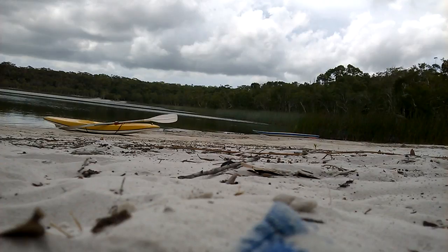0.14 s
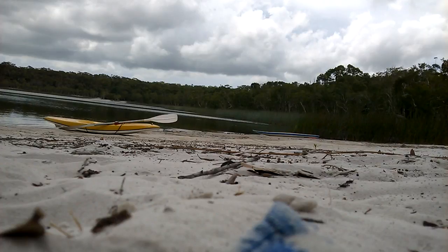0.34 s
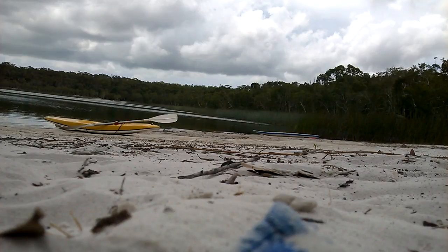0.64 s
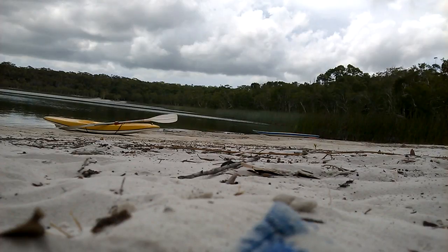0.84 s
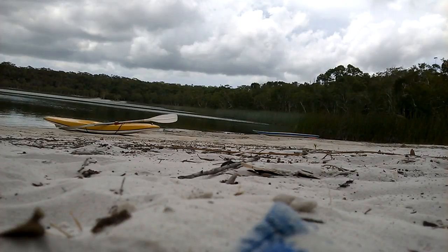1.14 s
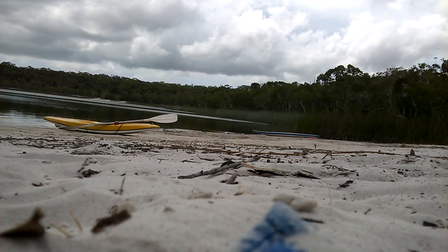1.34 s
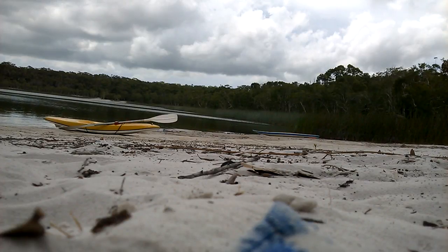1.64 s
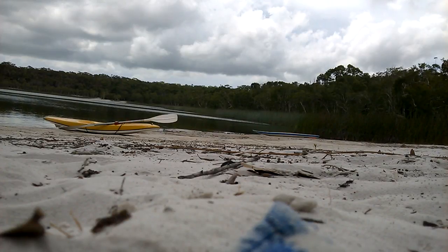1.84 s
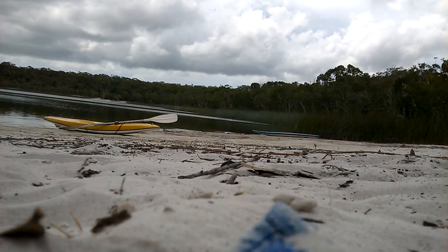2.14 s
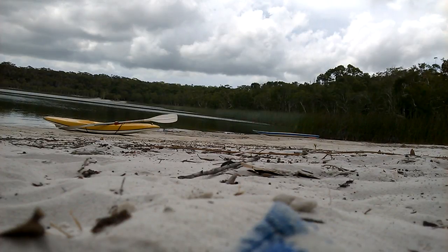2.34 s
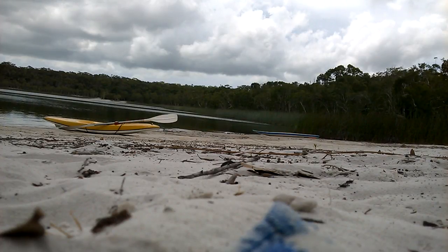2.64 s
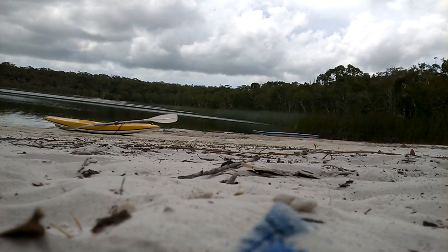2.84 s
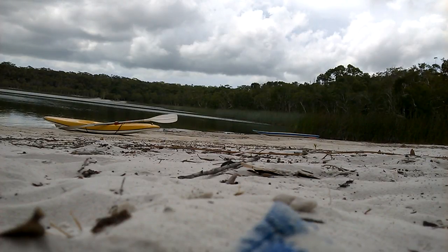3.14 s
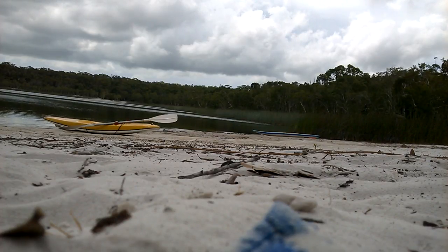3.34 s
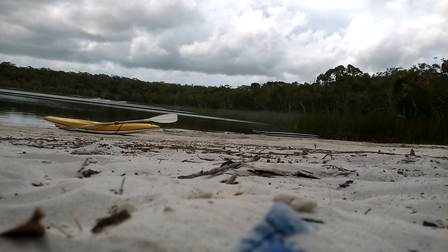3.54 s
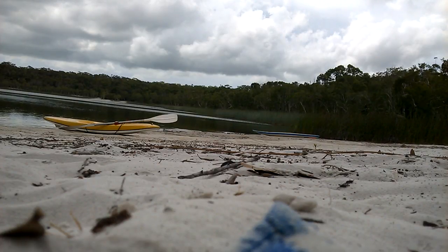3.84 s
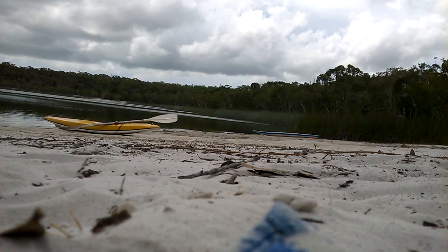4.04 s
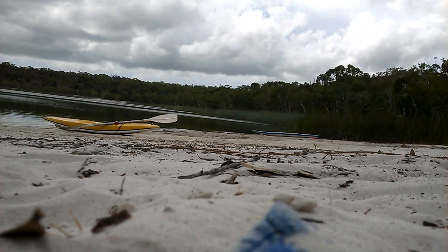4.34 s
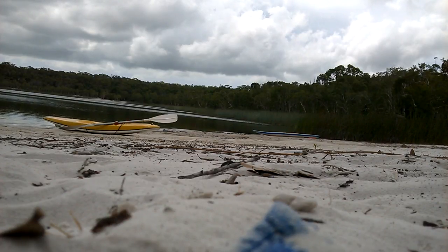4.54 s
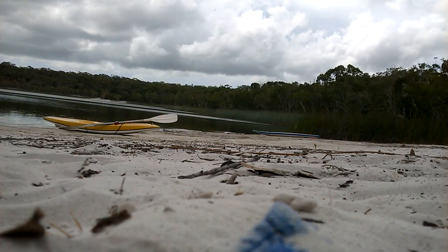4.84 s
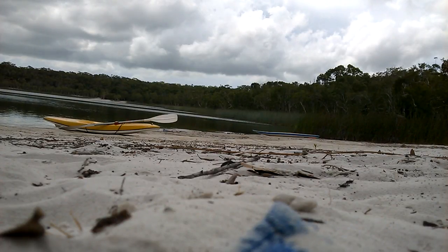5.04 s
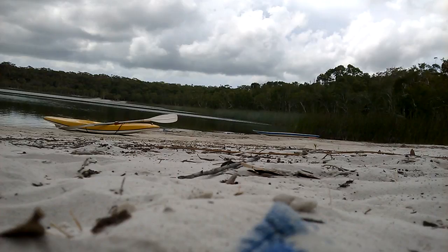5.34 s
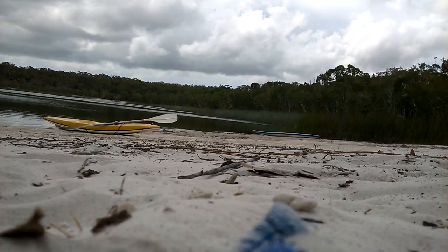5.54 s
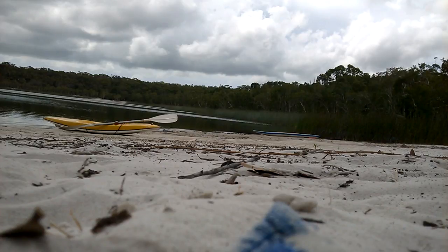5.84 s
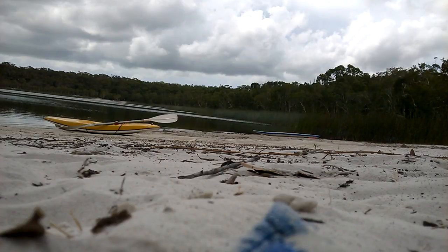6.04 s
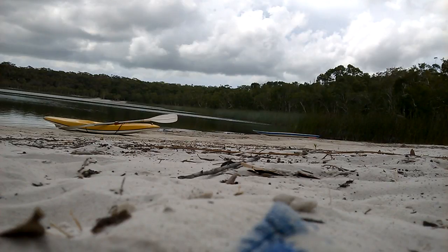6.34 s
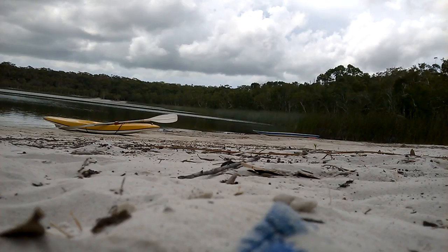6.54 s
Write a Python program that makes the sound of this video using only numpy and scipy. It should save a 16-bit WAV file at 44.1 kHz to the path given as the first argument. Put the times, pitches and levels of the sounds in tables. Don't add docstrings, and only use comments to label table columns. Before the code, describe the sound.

From 0 s a dense frog chorus is already in full cry beside a still, reedy lake. Dozens of croaks per few seconds overlap irregularly, each only about 0.02 to 0.07 s long: a tiny burst of rapid pulses, hollow and nasal around 1.2 kHz, with a lower sac resonance near 550 Hz. Some are sharp and close, others duller, deeper or half buried, and weak far-bank croaks blur behind. Water and trees return short, dull echoes. Far below in level, soft wind rumbles, cicadas throb in a faint steady shimmer around 3 to 8 kHz, and a thin near insect buzzes above 10 kHz, swelling to chirps roughly every 0.3 s. At about 2 s one very brief low gust passes. Strong croaks cluster around 4.1 to 5.1 s and near 5.9 s; the chorus continues undiminished to about 6.7 s. Mono, fixed beach microphone.

```python
import sys
import numpy as np
from scipy import signal
from scipy.fft import rfft, irfft
from scipy.io import wavfile

SR = 44100
rng = np.random.default_rng(int(sys.argv[2]) if len(sys.argv) > 2 else 0)


def log_audio(samples):
    frames = np.atleast_2d(samples).T
    limited = np.clip(frames, -1, 1)
    pcm = np.round(limited * 32767).astype(np.int16)
    wavfile.write(sys.argv[1], SR, pcm)


def amplitude_ratio(level_db):
    exponent = np.asarray(level_db, float) / 20
    return 10 ** exponent


N = 294588

# frequency_hz, density_db
WIND_SPECTRUM = [(12, -12), (20, -4), (76, 2.5), (105, 1), (313, -9.5), (420, -16), (550, -36), (920, -120)]
# frequency_hz, density_db
AIR_SPECTRUM = [(300, -4.5), (2000, -8), (3000, -16), (8800, -20), (14000, -21.5), (17000, -16),
                (19000, -31)]
# frequency_hz, density_db
MIDDLE_DRONE = [(1900, -10.5), (2600, -2.5), (3120, 0), (3910, 4.5), (5020, 3), (5500, 0.5), (5900, -18),
                (6500, -18)]
# frequency_hz, density_db
UPPER_DRONE = [(4000, -33), (5000, -13), (5900, -6), (6300, -2), (7200, -4.5), (8000, -9), (9500, -15.5)]
# pitch_hz, level_db
WHISTLES = [
    (3973, -90.5),
    (4963, -89.5),
]
# frequency_hz, density_db
BUZZ_SPECTRUM = [(8000, -36), (9300, -8.5), (10300, -2), (11100, 0.5), (12500, -3.5), (14000, -5.5),
                 (16000, -19)]
# frequency_hz, density_db
CHIRP_SPECTRUM = [(9500, -14), (11000, 1), (12500, 1), (13700, 5), (15500, -16), (17000, -5)]
# start_s, level_db
CHIRPS = [(.117, -81), (.444, -84), (.78, -83), (1.125, -82), (1.426, -80), (1.743, -84), (2.049, -83),
          (2.406, -88), (2.727, -82), (3.045, -86), (3.364, -82), (3.71, -81), (4.057, -89), (4.427, -86),
          (4.518, -87), (4.79, -80), (5.18, -84), (5.556, -83), (5.955, -84), (6.4, -88)]
# start_s, level_db, length_s, pulse_rate_hz
HIDDEN_FROGS = [(.333, -52, 0.019, 308), (.395, -44.5, 0.042, 288), (.731, -54, 0.034, 284.6),
                (1.088, -53, 0.039, 281), (.934, -43.5, 0.014, 291), (1.122, -55, 0.028, 285.6),
                (1.308, -43, 0.035, 273.3), (1.398, -39, 0.026, 308.6), (2.114, -53.5, 0.019, 288),
                (2.209, -43.5, 0.038, 278.6), (2.255, -52, 0.076, 258), (2.749, -45.5, 0.037, 310.7),
                (3.193, -42.5, 0.043, 290), (3.323, -50, 0.044, 267), (3.451, -44.5, 0.04, 293),
                (3.521, -52, 0.025, 273), (3.971, -41.5, .016, 274.7), (4.079, -44.5, 0.035, 289.3),
                (5.286, -53.5, 0.046, 276), (5.935, -51, 0.046, 269), (6.0, -65, .052, 266),
                (6.066, -49.5, 0.021, 280.6), (6.383, -44, 0.046, 269.2), (.002, -62, 0.02, 280),
                (5.247, -49, 0.021, 279), (6.047, -42, .018, 282), (6.398, -48, 0.018, 279),
                (1.258, -65, .03, 292)]
# start_s, level_db, length_s, pulse_rate_hz
LARGE_FROGS = [(.024, -59, 0.021, 281), (.064, -54, 0.03, 289), (1.54, -49.5, 0.035, 264),
               (1.923, -49.5, .053, 259.4), (2.18, -50.5, 0.037, 275.5), (2.508, -51.5, 0.033, 270.5),
               (2.524, -43, 0.024, 261.3), (2.688, -60.5, 0.034, 263), (2.875, -48, .028, 275.4),
               (3.059, -55.5, 0.039, 268.3), (3.54, -44.5, .037, 264.8), (3.57, -46.5, 0.027, 285.2),
               (3.689, -58, 0.018, 265), (3.761, -52, 0.037, 278.7), (4.195, -51, 0.026, 269.7),
               (4.32, -56.5, 0.034, 288), (4.359, -45, 0.035, 258), (4.542, -49, 0.047, 274),
               (4.82, -47.5, 0.045, 284), (4.877, -46.5, .049, 281.8), (5.058, -45, 0.011, 281),
               (5.345, -60, .029, 279.5), (5.547, -57.5, .019, 257.5), (5.693, -48, 0.048, 272.6),
               (6.348, -55.5, 0.032, 278.5), (6.612, -45.5, 0.022, 277.2)]
# start_s, level_db, length_s, pulse_rate_hz
MIDDLE_FROGS = [(.08, -45, 0.042, 285), (.123, -56, 0.046, 257), (.288, -57.5, 0.0088, 296),
                (.374, -52.5, 0.061, 264.5), (.912, -43, 0.043, 300.5), (1.458, -49, .052, 269),
                (1.72, -50.5, 0.035, 285), (1.809, -54, .018, 272), (1.902, -46.5, 0.028, 272.6),
                (1.944, -55, 0.032, 276.2), (2.406, -46.5, 0.025, 282.7), (2.755, -51, 0.015, 326),
                (2.831, -43, .019, 272.6), (2.954, -51.5, 0.033, 283), (3.136, -53.5, 0.025, 278),
                (3.798, -51, 0.022, 292), (3.834, -62, .029, 313), (4.403, -55, 0.036, 264.7),
                (4.767, -47, 0.05, 297.7), (5.228, -48.5, 0.044, 277), (5.367, -52.5, 0.038, 284.5),
                (5.785, -45.5, 0.045, 283.7), (6.031, -44, .039, 278), (6.53, -44.5, 0.028, 274.3)]
# start_s, level_db, length_s, pulse_rate_hz
FLOATING_FROGS = [(.171, -49, 0.027, 284), (.498, -45, 0.014, 268), (.512, -42.5, .059, 282.2),
                  (.785, -62, 0.024, 300.5), (1.058, -65.5, 0.073, 306), (2.727, -54, .017, 288),
                  (2.933, -62, 0.056, 304.4), (3.069, -42.5, 0.039, 265.3), (3.431, -59, 0.076, 289),
                  (3.938, -61.5, 0.031, 286), (4.062, -57, 0.052, 282.3), (4.098, -48.5, 0.072, 277),
                  (4.92, -45, 0.018, 253), (5.028, -43, 0.0308, 274.8), (5.221, -78, 0.06, 278),
                  (5.885, -43, 0.0265, 278.7), (5.407, -55.5, 0.03, 295), (5.504, -54, .031, 288.4),
                  (5.575, -50, .026, 281), (5.652, -60, .032, 289.4), (5.773, -52, 0.029, 281),
                  (5.848, -49, .012, 299), (5.908, -43, 0.035, 265.8), (6.186, -56.5, 0.025, 286),
                  (6.238, -58, .017, 308), (6.308, -56.5, 0.034, 289.7), (6.479, -60, 0.029, 302),
                  (6.499, -45, 0.024, 283), (6.674, -57, .032, 300)]
# start_s, level_db, length_s, pulse_rate_hz
SMALL_FROGS = [(.556, -40.5, 0.043, 289.6), (.65, -46.5, 0.032, 290.7), (.689, -50, .027, 303),
               (1.015, -50.5, 0.026, 283.6), (1.377, -57, 0.029, 263), (1.661, -45.5, 0.029, 287),
               (1.742, -42, 0.033, 277), (1.831, -40, 0.039, 282.4), (2.051, -43.5, 0.043, 294.5),
               (2.312, -41, 0.0446, 277), (2.469, -49, 0.022, 290), (2.619, -41.5, 0.034, 275.4),
               (2.797, -44, 0.048, 278.2), (3.266, -48, 0.027, 262), (3.268, -41.5, 0.051, 276.2),
               (3.345, -40.5, .039, 281.7), (4.018, -54.5, 0.015, 323), (4.121, -37, 0.022, 274.6),
               (4.234, -43, 0.038, 297), (4.479, -46.5, 0.048, 287), (4.574, -37.5, 0.0435, 271.7),
               (4.631, -41, 0.04, 281.5), (4.762, -48.5, 0.038, 285.3), (4.966, -44.5, 0.025, 286.6),
               (5.003, -39.5, 0.0202, 273), (5.082, -43, 0.043, 302.3), (5.127, -45, 0.017, 270),
               (5.865, -38, 0.045, 275.3), (6.15, -50, 0.027, 293.4), (6.572, -38.5, 0.043, 310)]
# croaks, throat_hz, sac_db (against the throat)
VOICES = [(SMALL_FROGS, 1312, -11.5), (MIDDLE_FROGS, 1222, -11), (LARGE_FROGS, 1157, -6),
          (FLOATING_FROGS, 1265, -4.5), (HIDDEN_FROGS, 1275, -21)]
# delay_s, level_db
TREE_ECHOES = [
    (0.012, -11),
    (0.022, -13.5),
    (0.042, -32.5),
    (.067, -23.5),
    (0.103, -56.5),
    (0.16, -40.5),
]
# frequency_hz, gain_db
SAND_PATH = [(200, -35), (400, -6.5), (480, -1), (1350, 0), (1550, -5.5), (1830, -16.5), (2500, -17),
             (3500, -36.5)]

WIND_DB, WIND_PATCHY_DB, AIR_DB = -68, 2.8, -76
GUST_S, GUST_DB, GUST_HALF_S = 1.98, 6.5, .058
DRONE_DB, DRONE_WANDER_DB, UPPER_DRONE_DB = -78, .4, -82
BUZZ_DB, BUILD_DB, BUILD_DB_PER_S = -82.5, 1.5, .7
CHIRP_HALF_S = .014
THROAT_HZ_PER_DB, USUAL_DB = 2.5, -47
FAR_FROGS_DB = -71.5
CUTOFF_HZ = 17150


def rms_one(x):
    return x / np.sqrt(np.mean(x ** 2) + 1e-20)


def drift(rate_hz):
    pole = np.exp(-80 * np.pi * rate_hz / SR)
    noise = rng.standard_normal(N // 40 + 2002)
    slow = signal.lfilter([1], [1, -2 * pole, pole * pole], noise)[2000:]
    return np.interp(np.arange(N) / 40, np.arange(len(slow)), rms_one(slow))


def coloured(spectrum, patchy_db):
    hz = np.arange(N // 2 + 1) * SR / N + 1
    at_hz, db = np.transpose(spectrum)
    whole = rfft(rng.standard_normal(N)) * amplitude_ratio(np.interp(np.log(hz), np.log(at_hz), db, -99, -99))
    band = np.floor(3 * np.log2(hz / at_hz[0]))
    count = int(3 * np.log2(at_hz[-1] / at_hz[0])) + 1
    together = drift(7.0)
    out = np.zeros(N)
    for k in range(count):
        flicker_db = patchy_db * (.18 * together + drift(8.0))
        out += irfft(whole * (band == k), N) * amplitude_ratio(flicker_db)
    return rms_one(out)


def wind():
    t = np.arange(N) / SR
    gust_db = GUST_DB * np.exp(-((t - GUST_S) / GUST_HALF_S) ** 2)
    return amplitude_ratio(WIND_DB + gust_db) * coloured(WIND_SPECTRUM, WIND_PATCHY_DB)


def still_air():
    return amplitude_ratio(AIR_DB) * coloured(AIR_SPECTRUM, patchy_db=.15)


def throb(rate_hz, depth, sharp):
    turn = np.cumsum(rate_hz * (1 + .002 * drift(1.0))) / SR
    return rms_one(1 + depth * (.5 + .5 * np.cos(2 * np.pi * turn)) ** sharp)


def cicadas():
    flutter = amplitude_ratio(1.17 * drift(39.0))
    middle = throb(200, .33, 4) * coloured(MIDDLE_DRONE, patchy_db=.47)
    middle *= amplitude_ratio(DRONE_DB + DRONE_WANDER_DB * drift(3.7))
    upper = amplitude_ratio(UPPER_DRONE_DB) * throb(60, .5, 1.5) * coloured(UPPER_DRONE, patchy_db=.6)
    return flutter * (middle + upper)


def whistles():
    out = np.zeros(N)
    for pitch_hz, level_db in WHISTLES:
        phase = 2 * np.pi * np.cumsum(pitch_hz + 3.1 * drift(2.0)) / SR
        out += amplitude_ratio(level_db - 1 + 2.5 * drift(1.8)) * np.sin(phase)
    return out


def near_insect():
    t = np.arange(N) / SR
    s = np.transpose(CHIRPS)[0]
    build_db = .65 * (BUILD_DB + BUILD_DB_PER_S * s)
    corners_s = np.ravel([s - .06, s + .016, s + .052], "F")
    climb_db = np.interp(t, corners_s, np.ravel([build_db, build_db, 0 * s], "F"))
    buzz = amplitude_ratio(BUZZ_DB + climb_db) * coloured(BUZZ_SPECTRUM, patchy_db=.8)
    strokes = np.zeros(N)
    for start_s, level_db in CHIRPS:
        strokes += amplitude_ratio(level_db + 5) * np.exp(-((t - start_s) / CHIRP_HALF_S) ** 2)
    return buzz + strokes * coloured(CHIRP_SPECTRUM, patchy_db=1)


def rings(t, at, hz, decay_s, rise_s):
    age = np.maximum(t - at[:, None], 0)
    envelope = (1 - np.exp(-age / rise_s)) * np.exp(-age / decay_s)
    return envelope * np.sin(2 * np.pi * hz[:, None] * age)


def croak(length, rate_hz, throat_hz, sac_db, chance):
    t = np.arange(int((length + .025) * SR)) / SR
    beat = np.arange(18) / rate_hz
    part = beat / length
    on = np.clip((1.25 - part) / .32, 0, 1)
    at = beat * (.94 + .0441 * part)
    effort = on * (1 + .4 * np.sin(np.pi * part) - .2 * part + .55 * np.exp(-beat / .003))

    loose = np.minimum(2.1 * part, 1)
    high_hz = throat_hz * (1.055 - .081 * part)
    in_step = np.round(at * high_hz[0]) / high_hz[0]
    slip = np.maximum(in_step + loose * (at - in_step + .00023 * chance[0]), 0)
    force = effort * amplitude_ratio(3.74 * loose * np.clip(chance[1], -3, 1.4))
    scatter = 1 + .03 * loose * chance[2]

    throat = (force * (1 - .45 * part)) @ rings(t, slip, high_hz * scatter, .002, .0004)
    low_hz = .916 * throat_hz / scatter
    throat += (force * (.21 + part)) @ rings(t, slip, low_hz, .0018, .00042)
    mouth = force @ rings(t, slip, 800 * (1 + .22 * chance[3]), .002, .00054)

    swell = on * (.5 + .5 * part ** .33) * amplitude_ratio(3.1 * chance[3])
    sac_at = np.maximum(at + .00013 * chance[2], 0)
    sac_hz = 2 * rate_hz * (1.045 - .065 * part)
    sac = swell @ rings(t, sac_at, sac_hz, .0028, .0011)

    span = slice(0, int(length * SR))
    upper = (throat + amplitude_ratio(-12) * mouth) / np.std(throat[span])
    return upper + amplitude_ratio(sac_db + 1.5) * sac / np.std(sac[span])


def frogs(table):
    beds = np.zeros((4, N + 8000))
    chances = rng.standard_normal((len(table), 5, 18))
    for k, (start_s, level_db, *voice) in enumerate(table):
        chance = chances[k]
        sound = amplitude_ratio(level_db - 2) * croak(*voice, chance)
        i = int((start_s - .0005) * SR)
        bounce = i + int(SR * (.001462 + .0012 * abs(chance[4, 0])))
        beds[k % 4, i:i + len(sound)] += sound
        beds[k % 4, bounce:bounce + len(sound)] += .24 * sound
    return beds[:, :N]


def near_frogs():
    table = []
    for croaks, throat_hz, sac_db in VOICES:
        for row in croaks:
            table.append((*row, throat_hz + THROAT_HZ_PER_DB * (row[1] - USUAL_DB), sac_db))
    return frogs(table)


def far_frogs(count=260):
    u = rng.random((count, 6))
    u[:, 0] = (u[:, 0] + np.arange(count)) / count
    table = u * [N / SR, 5, .02, 40, 300, 6] + [.01, -4, .03, 260.5, 1080.5, -6.5]
    return amplitude_ratio(FAR_FROGS_DB) * rms_one(frogs(table))


def trees(beds):
    response = np.zeros((4, 12000))
    cluster = rms_one(np.exp(-np.arange(1200) / (SR * .0021)))
    for delay_s, level_db in TREE_ECHOES:
        i = int(delay_s * SR)
        leaves = rng.standard_normal((4, 1200)) / np.sqrt(1200)
        response[:, i:i + 1200] += amplitude_ratio(level_db) * cluster * leaves
    return signal.fftconvolve(beds, response, axes=1)[:, :N]


def along_path(x):
    at_hz, db = np.transpose(SAND_PATH)
    hz = np.arange(2049) * SR / 4096 + 1
    gain = amplitude_ratio(np.interp(np.log(hz), np.log(at_hz), db))
    cepstrum = irfft(np.log(gain))
    cepstrum[1:2048] *= 2
    cepstrum[2049:] = 0
    return signal.fftconvolve(x, irfft(np.exp(rfft(cepstrum))))[:N]


def scene():
    background = wind() + still_air() + cicadas() + whistles() + near_insect()
    beds = near_frogs() + far_frogs()
    voices = along_path(np.sum(beds + trees(beds), axis=0))
    return (background + voices)[None]


def roll_off(x):
    return signal.sosfilt(signal.butter(12, 17100, fs=SR, output="sos"), x)


def record(dry):
    low_pass = signal.ellip(10, 1, 40, CUTOFF_HZ, fs=SR, output="sos")
    mix = signal.sosfilt(low_pass, dry)
    return roll_off(mix)


dry = scene()
out = record(dry)
log_audio(out)
```